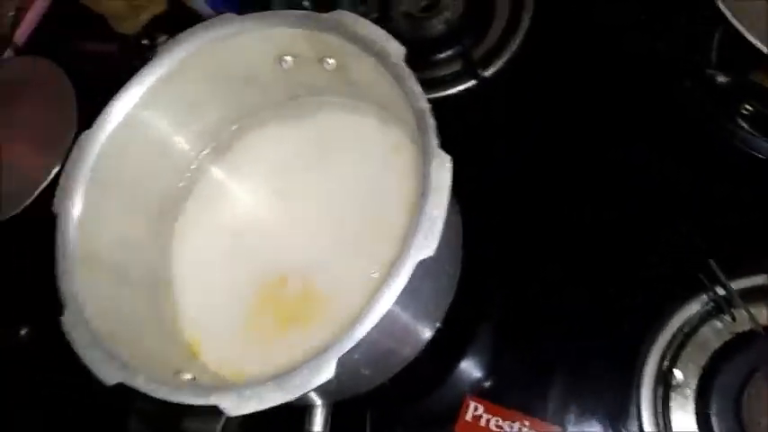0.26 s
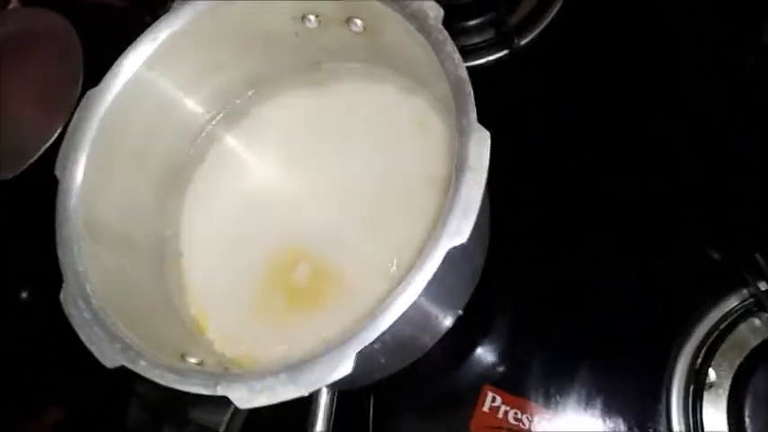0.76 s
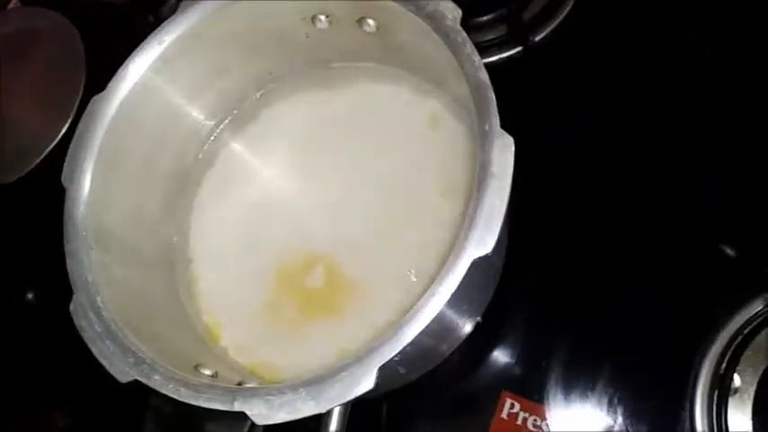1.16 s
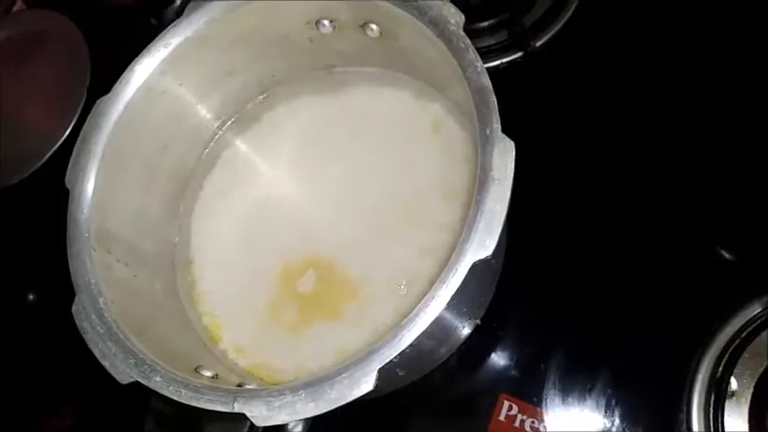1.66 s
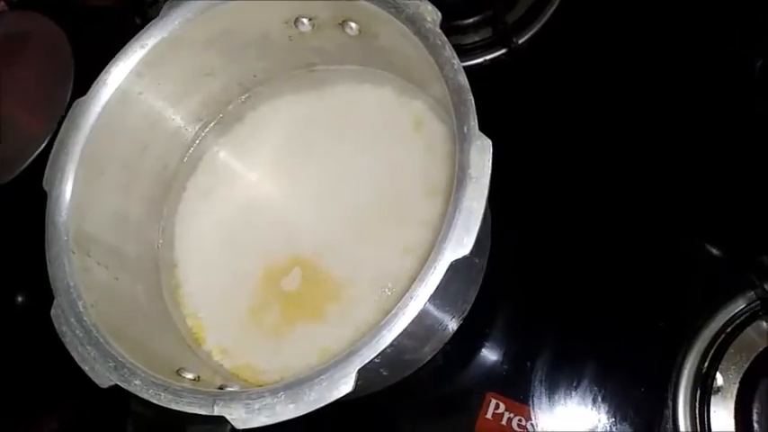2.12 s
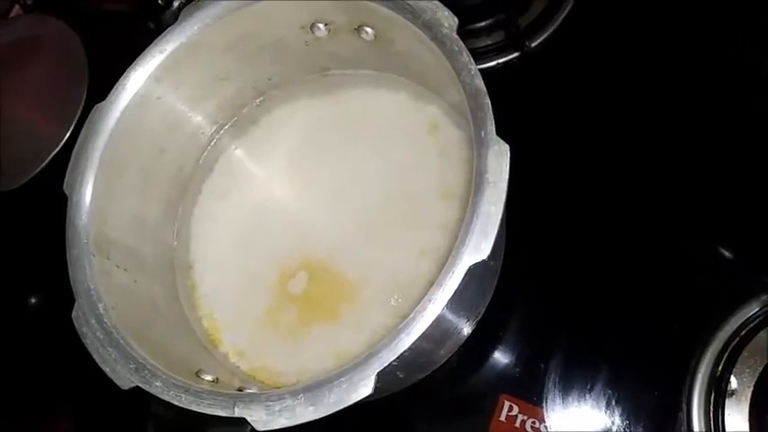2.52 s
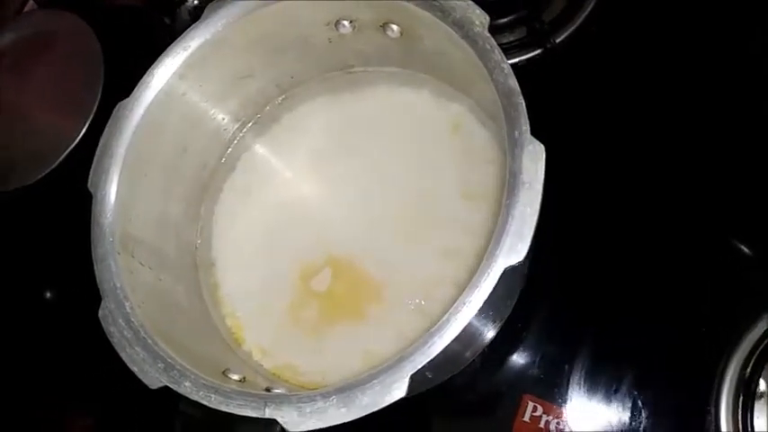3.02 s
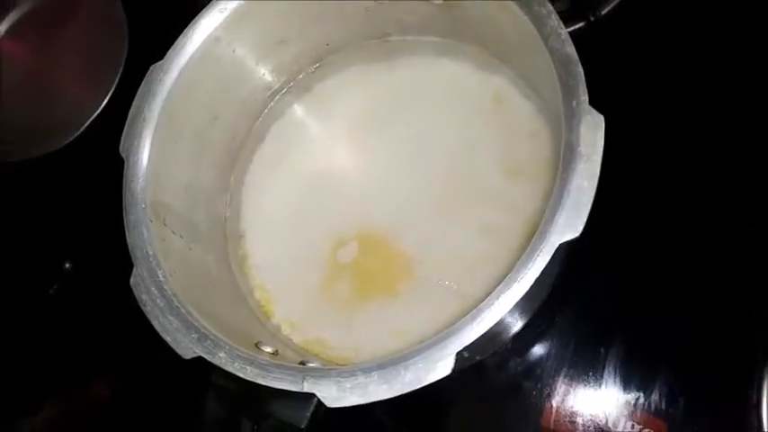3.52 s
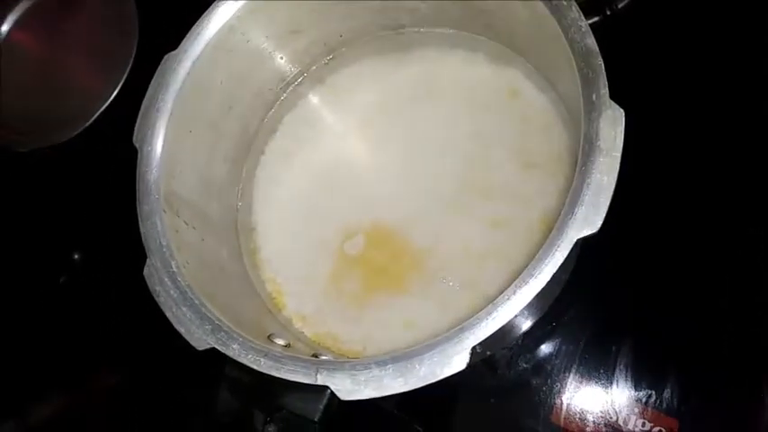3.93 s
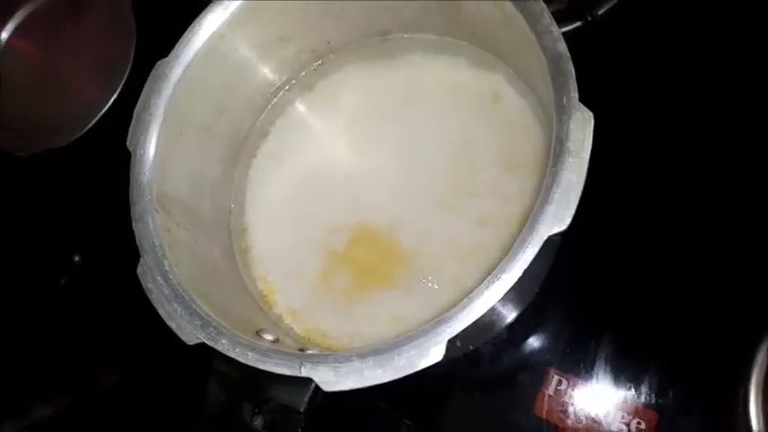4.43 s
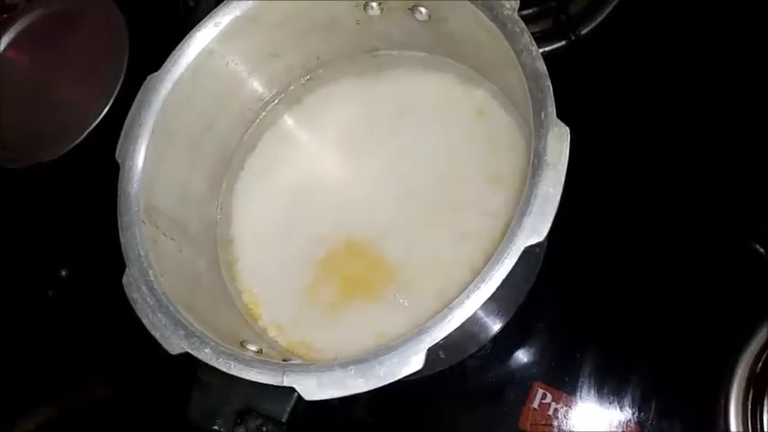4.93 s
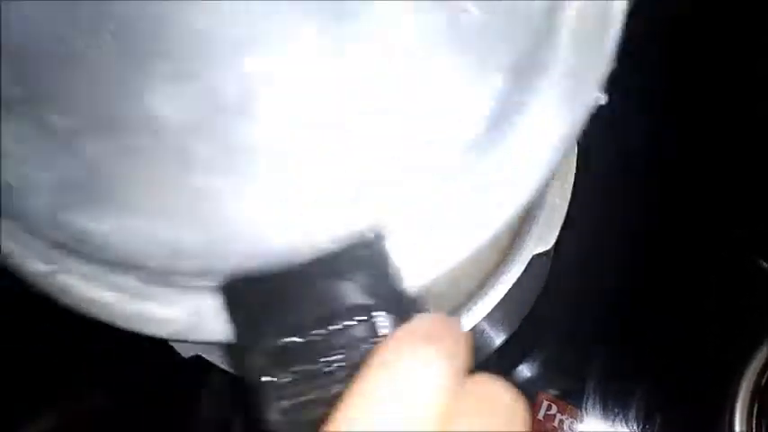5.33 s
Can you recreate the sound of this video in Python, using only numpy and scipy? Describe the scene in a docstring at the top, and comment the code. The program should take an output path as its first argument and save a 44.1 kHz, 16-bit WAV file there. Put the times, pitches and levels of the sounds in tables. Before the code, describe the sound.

In a quiet kitchen, two sharp metallic lighter snaps ignite a gas ring; the flame flutters while the lighter drops and a pot lid knocks and scrapes.

```python
"""A quiet kitchen and a hiss of gas come first; gusts, taps and bumps follow at the stove.
A spark lighter snaps twice, the ring under an open pressure cooker catches with a whoomp and flutters on.
Steel clinks, the lighter clatters down, the lid is picked up with a clank, later scrapes and meets the rim.
Gas, flame and friction are filtered noise under envelopes; whoomp and bumps are damped sines.
Struck metal is a noise crack, modes that ring on and the tail of a small, hard room."""
import sys
import numpy as np
from scipy import signal
from scipy.fft import rfft, irfft
from scipy.io import wavfile
from scipy.ndimage import uniform_filter1d

SR = 44100
rng = np.random.default_rng(int(sys.argv[2]) if len(sys.argv) > 2 else 0)


def persist_wave(psi):
    """Save psi, clipped to +-1, as 16-bit WAV."""
    counts = np.round(np.clip(psi, -1, 1) * 32767).astype(np.int16)
    wavfile.write(sys.argv[1], SR, np.atleast_2d(counts).T)


N = 245637
TIME = np.arange(N) / SR
AGE = TIME[:SR]  # the second that follows an event


def gain_of(db):
    """Level: converts decibels to an amplitude ratio."""
    return 10 ** (np.asarray(db) / 20)


def evened(x):
    """Normalisation: scales a signal to an rms of one."""
    return x / np.sqrt(np.mean(x ** 2) + 1e-20)


def read(points, hz):
    """Interpolation: reads a curve on a logarithmic frequency axis."""
    f, value = np.transpose(points)
    return np.interp(np.log(hz + 1), np.log(f + 1), value)


def coloured(points):
    """Spectral shaping: turns a table of levels into a magnitude spectrum."""
    return lambda hz: gain_of(read(points, hz))


def add(mix, s, sound):
    """Superposition: lays a stereo sound into the mix at time s."""
    part = mix[:, max(round(s * SR), 0):][:, :sound.shape[1]]
    part += sound[:, :part.shape[1]]


def dying(t60):
    """Exponential decay: loses 60 dB in t60 seconds."""
    return np.exp(-np.log(1000) * AGE / max(t60, 1e-3))


def held(hold, t60):
    """Sustained decay: holds for a while, then loses 60 dB in t60 seconds."""
    return np.exp(-np.log(1000) * np.maximum(AGE - hold, 0) / t60)


def onset(time_constant):
    """Exponential build-up: softens the start of a sound."""
    return 1 - np.exp(-AGE / time_constant)


def arch(length):
    """Half-sine envelope: swells and fades over length seconds."""
    return np.sin(np.pi * np.minimum(AGE / length, 1))


def wander(rate_hz, size):
    """Low-passed random fluctuation: slow chance with an rms of one."""
    hz = np.fft.rfftfreq(size, 1 / SR)
    spectrum = rfft(rng.standard_normal(size))
    return evened(irfft(spectrum / (1 + (hz / rate_hz) ** 4), size))


# Likeness of the sound at the two microphones: (frequency [Hz], left-right correlation [1])
MICROPHONE_LIKENESS = [(60, 0.9), (130, 0.75), (290, 1), (640, .5), (1300, -0.09), (3000, 0), (15000, 0.03)]


def noise(shape, size):
    """Spatial coherence: stereo noise shaped by shape(Hz), alike in both channels only at long waves."""
    hz = np.fft.rfftfreq(size, 1 / SR)
    left, other = rfft(rng.standard_normal((2, size)))
    same = np.clip(read(MICROPHONE_LIKENESS, hz), -1, 1)
    right = same * left + np.sqrt(1 - same ** 2) * other
    return evened(irfft(np.array([left, right]) * shape(hz), size))


def band(centre_hz, octaves):
    """Band-pass spectrum: a bell on an octave scale."""
    return lambda hz: np.exp(-.5 * (np.log2((hz + 1) / centre_hz) / octaves) ** 2)


def body(resonances, low_hz):
    """Damped resonance: broad peaks add in power, and small objects radiate no deep bass."""
    def shape(hz):
        power = sum(gain_of(db) ** 2 / (1 + (2 * (hz - f) / width) ** 2) ** 2
                    for f, width, db in resonances)
        return np.sqrt(power) * hz ** 2 / (hz ** 2 + low_hz ** 2)
    return shape


def crowded(shape, ripple_db):
    """Modal density: countless close modes comb a smooth spectrum into peaks and gaps."""
    grid = np.linspace(0, SR / 2, num=300)
    comb = rng.standard_normal(len(grid))
    comb = np.minimum(evened(comb - uniform_filter1d(comb, size=7)), 1.3)

    def combed(hz):
        ripple = ripple_db * np.interp(hz, grid, comb) * hz / (hz + 2500)  # least in the bass
        return shape(hz) * gain_of(ripple)
    return combed


def ring(modes, longest_t60, scatter=0.83):
    """Modal decay: hand-damped partials, which reflections swell and fade differently at each microphone."""
    out = np.zeros((2, SR))
    knots = np.linspace(0, 1, num=60)
    for hz, db, t60 in modes:
        t60 = np.clip(t60, .02, max(longest_t60, .02))
        t = AGE[:int(t60 * SR)]
        direct = np.exp(2j * np.pi * rng.random((2, 1)))
        real, imaginary = rng.standard_normal((2, 2, len(knots)))
        paths = direct + scatter * (real + 1j * imaginary) / np.sqrt(2)
        drift = np.array([np.interp(t, knots, path) for path in paths]) / np.hypot(1, scatter)
        partial = drift * np.exp((2j * np.pi * hz - np.log(1000) / t60) * t)
        out[:, :len(t)] += gain_of(db) * partial.imag
    return out


def room(source, t60, bass_life, treble_life):
    """Reverberation: in the tiled kitchen bass, middle and treble die at their own speeds."""
    below_mid = signal.filtfilt(*signal.butter(2, 2500, fs=SR), source)
    below_top = signal.filtfilt(*signal.butter(4, 10000, fs=SR), source)
    bass = below_mid * dying(t60 * bass_life)
    middle = (below_top - below_mid) * dying(t60)
    treble = (source - below_top) * dying(t60 * treble_life)
    return bass + middle + treble


def blows(rows, spectrum, modes, attack=0.00075, build=0.0095, bass_life=1.05, treble_life=.9,
          spiky_db=2, room_tilt_db=-.3, sustain=1.2):
    """Impact: a crack scattered by pot and hob, the metal's ring, then the room."""
    out = np.zeros((2, N))
    for s, crack_db, crack_t60, room_db, room_t60, ring_db, pan_db, hardness_db, *_ in rows:
        colour = crowded(spectrum, ripple_db=4)

        def struck(tilt_db):
            """Contact stiffness: a harder contact wakes the high resonances more."""
            return noise(lambda hz: colour(hz) * gain_of(tilt_db * np.log2((hz + 500) / 4000)), SR)
        crack = gain_of(crack_db) * dying(crack_t60) * struck(hardness_db)
        tail = room(struck(hardness_db + room_tilt_db), room_t60, bass_life, treble_life)
        tail = gain_of(room_db) * tail * onset(build)
        # uneven levels let single echoes stand out
        unevenness = evened(uniform_filter1d(rng.standard_normal((2, SR)), size=40))
        echoes = evened(gain_of(spiky_db * unevenness))
        ringing = gain_of(ring_db) * ring(modes, longest_t60=sustain * room_t60)
        sound = ((crack + tail) * echoes + ringing) * onset(attack)
        add(out, s, sound * gain_of([[pan_db / 2], [-pan_db / 2]]))
    return out


# How hard the flame burns: (time [s], vigour [dB])
FLAME_VIGOUR = [(1.5, 0.5), (1.75, -6), (2.25, 3), (2.62, -5), (2.85, -20), (3.3, -20), (3.95, -10),
                (4.45, -14), (4.6, -20.5), (5.57, -25.5)]
CATCH_S, ROAR_BUILD_S = FLAME_VIGOUR[0][0], .65


def vigour():
    """Heat release: the flame's strength in dB, at its lowest before ignition."""
    s, db = np.transpose(FLAME_VIGOUR)
    return np.interp(TIME, s, db, left=db.min())


# The quiet kitchen: (frequency [Hz], relative level [dB per Hz])
KITCHEN_COLOUR = [(15, -53), (25, -32), (66, -12.5), (101, -25), (118, -20.5), (146, -2), (186, -14),
                  (278, -7.5), (394, -15.5), (790, -16), (856, -14), (1390, -18), (9520, -33.5),
                  (15000, -38)]
KITCHEN_DB, WHINE_HZ, WHINE_DB = -64.5, 15624, -72


def kitchen(whine_width_hz=7):
    """Background noise: steady broadband air and a thin narrow-band electronic whine."""
    air = gain_of(KITCHEN_DB) * noise(coloured(KITCHEN_COLOUR), N)
    whine = noise(lambda hz: 1 / np.hypot(1, (hz - WHINE_HZ) / whine_width_hz) ** 1.3, N)
    return air + gain_of(WHINE_DB) * whine


# The hiss of the gas jet: (frequency [Hz], relative level [dB per Hz])
JET_SPECTRUM = [(3000, -41.5), (6000, -20), (7800, -7.5), (9400, 1.5), (11500, -8), (12600, -20),
                (15000, -29.5)]
# The gas valve: wide open at first, then eased back to a feed that follows the flame's vigour
OPEN_S, EASE_S, OPEN_RISE_S, EASE_T60_S = 0.037, .385, 0.041, .25
OPEN_DB, FEED_DB, FEED_FOLLOW = -60.5, -70.5, .3  # FEED_FOLLOW: dB per dB of vigour
SPIT_DB, SPIT_T60_S, SPIT_HZ = -49.5, 0.36, 8040  # the first spit of gas through the nozzle


def jet(spit_octaves=0.46):
    """Jet turbulence: gas hisses through the nozzle, loudest as the valve opens."""
    opened = np.clip((TIME - OPEN_S) / OPEN_RISE_S, 0, 1)
    eased = np.exp(-np.log(1000) * np.maximum(TIME - EASE_S, 0) / EASE_T60_S)
    flow = gain_of(OPEN_DB) * opened * eased + gain_of(FEED_DB + FEED_FOLLOW * vigour())
    out = flow * noise(coloured(JET_SPECTRUM), N)
    burst = np.minimum(AGE / OPEN_RISE_S, 1) * dying(SPIT_T60_S)
    add(out, OPEN_S, gain_of(SPIT_DB) * burst * noise(band(SPIT_HZ, spit_octaves), SR))
    return out


# Gusts of gas and air: (time [s], length [s], level [dB], frequency [Hz])
GAS_GUSTS = [(.07, 0.29, -51.5, 161.6), (.9, 0.21, -60.5, 202.5), (1.85, 0.12, -46, 164),
             (4.14, .27, -45, 140), (5.08, 0.097, -54.5, 159.5)]


def gusts(gust_octaves=0.12, rush_db=-11, rush_octaves=0.89):
    """Cavity resonance: gusts thrum briefly in the hollow under the pot, with a soft rush."""
    out = np.zeros((2, N))
    for s, length, db, hz in GAS_GUSTS:
        thrum = noise(band(hz, gust_octaves), SR)
        rush = gain_of(rush_db) * noise(band(hz, rush_octaves), SR)
        add(out, s, gain_of(db) * arch(length) * (thrum + rush))
    return out


# Dull bumps: (time [s], level [dB])
COUNTER_BUMPS = [(0.116, -47), (0.644, -54), (.724, -51), (2.599, -42.5), (3.13, -48), (3.21, -49.5),
                 (4.99, -51)]
COUNTER_HZ, COUNTER_T60_S = 68, 0.31


def bumps(rise=0.0069):
    """Single-mode vibration: every bump wakes the same low note of the counter."""
    out = np.zeros((2, N))
    for s, db in COUNTER_BUMPS:
        note = np.sin(2 * np.pi * COUNTER_HZ * AGE)
        thud = gain_of(db) * dying(COUNTER_T60_S) * onset(rise) * note
        add(out, s, np.array([thud, thud]))
    return out


# Light taps of knob, trigger and handle:
# (time [s], knock level [dB], knock frequency [Hz], tick level [dB], tick frequency [Hz])
HANDLING_TAPS = [(.279, -47, 760, -43, 9900), (0.364, -56, 520, -63, 10000),
                 (0.882, -42.5, 1950, -46, 7960), (1.606, -42, 614, -51, 1490),
                 (2.434, -47, 1291, -63.5, 8900), (4.02, -52, 620, -70, 8900), (4.903, -76, 900, -55, 5300),
                 (5.422, -52, 1400, -47, 11600)]
KNOCK_OCTAVES, KNOCK_T60_S = 0.54, 0.11
TICK_OCTAVES, TICK_T60_S = 0.23, 0.039


def taps(room_db=-13, room_t60=0.31, knock_rise=0.0028, tick_rise=0.00076):
    """Damped resonance: each tap is a knock and a tick with a little of the room after it."""
    out = np.zeros((2, N))

    def tap(db, hz, octaves, rise, t60):
        """Double decay: a quickly damped resonance and its reverberation."""
        envelope = (dying(t60) + gain_of(room_db) * dying(room_t60)) * onset(rise)
        return gain_of(db) * envelope * noise(band(hz, octaves), SR)
    for s, knock_db, knock_hz, tick_db, tick_hz in HANDLING_TAPS:
        add(out, s, tap(knock_db, knock_hz, KNOCK_OCTAVES, knock_rise, KNOCK_T60_S))
        add(out, s, tap(tick_db, tick_hz, TICK_OCTAVES, tick_rise, TICK_T60_S))
    return out


# Lighter snaps: (time [s], crack level [dB], crack t60 [s], room level [dB], room t60 [s],
# ring level [dB], left-right pan [dB], hardness [dB per octave])
LIGHTER_SNAPS = [(.6412, -3.5, 0.065, -14.5, 0.4, -25, -0.5, 0.58),
                 (1.3732, -5, 0.058, -11.5, 0.29, -33, 0.5, -0.54)]
# Broad resonances of the trigger: (frequency [Hz], width [Hz], level [dB])
TRIGGER_RESONANCES = [(520, 130, -12), (675, 382, -14), (1600, 2700, -12.5), (3260, 1500, -9),
                      (3770, 730, -6.5), (4240, 300, -16), (5060, 140, -23), (5450, 440, -9.5),
                      (6930, 990, -4.5), (8580, 727, -0.5), (9840, 6490, -6), (9250, 670, 0),
                      (10400, 810, -8), (10200, 232, -10.5), (12180, 147, -15.5), (15000, 2177, -9.5)]
# Modes of the trigger that ring on: (frequency [Hz], level [dB], t60 [s])
TRIGGER_MODES = [(1523, -14, 0.34), (2321, -14, 0.55), (2883, -11.5, 0.42), (3310, -12.5, 0.35),
                 (4100, -8.5, 0.13), (3590, -16, 0.32), (4370, -14, 0.27), (5200, -11.5, 0.17),
                 (5292, -2.5, 0.62), (6070, -5.5, 0.4), (6239, -11, 0.42), (6622, -12, 0.58),
                 (7600, -11, 0.46), (8470, -5.5, 0.23), (8500, 7, 0.34), (8950, -8, 0.44), (9300, -6, 0.49),
                 (9422, -4, 0.33), (9586, -9, 0.53), (10540, -3, 0.31), (10370, -5, 0.4),
                 (11113, -10.5, 0.33), (11276, -11, 0.26), (12500, -10, 0.36), (12800, -13.5, 0.32),
                 (13642, -16.5, 0.32), (14708, -10.5, 0.32), (15800, -5, 0.33)]


def lighter_snaps():
    """Impulsive excitation: the spark lighter's snap sets its many metal modes ringing."""
    return blows(LIGHTER_SNAPS, body(TRIGGER_RESONANCES, low_hz=130), TRIGGER_MODES, bass_life=1.1,
                 treble_life=0.87, spiky_db=2.5, room_tilt_db=-0.32, sustain=1.3)


# The ignition shakes the air of the room: (frequency [Hz], level [dB], t60 [s])
ROOM_MODES = [(65.2, -21, 0.55), (79.6, -23.5, 0.82), (195.1, -28, 0.24), (130.9, -33, 0.21),
              (240.7, -48.5, 0.26)]


def ignition(s=1.3835, spread=0.048, puff_db=-30, puff_hz=135, puff_t60=0.18,
             rumble_db=-35, rumble_hz=55, rumble_t60=0.63):
    """Beating room modes: the flame runs round the ring with a puff; two close modes throb as they die."""
    out = np.zeros((2, N))

    def swell(t60):
        """Sustained decay: holds while the flame spreads, then dies."""
        return onset(.004) * held(spread, t60)
    boom = sum(gain_of(db) * swell(t60) * np.sin(2 * np.pi * hz * AGE) for hz, db, t60 in ROOM_MODES)
    puff = gain_of(puff_db) * swell(puff_t60) * noise(band(puff_hz, 0.92), SR)
    rumble = gain_of(rumble_db) * swell(rumble_t60) * noise(band(rumble_hz, .4), SR)
    add(out, s, boom + puff + rumble)
    return out


# The flame's roar: (frequency [Hz], relative level [dB per Hz])
ROAR_SPECTRUM = [(120, -30.5), (200, 1), (340, -9.5), (470, -4.5), (1020, -23.5), (1130, -16.5),
                 (1820, -22), (4000, -39), (5200, -69), (8800, -120)]
# Levels and pitch at a vigour of 0 dB; ROAR_FOLLOW in dB per dB of vigour
FLUTTER_DB, FLUTTER_HZ, FLUTTER_HZ_PER_DB = -46.5, 170.2, 0.85
ROAR_DB, ROAR_FOLLOW, ROAR_START_DB = -55.5, 0.59, -32


def flame(width_hz=22, rumble_db=-11, flicker_db=3, flicker_hz=12):
    """Driven resonance: turbulence drums under the pot, over a soft roar and a low rumble."""
    drive, burning = vigour(), TIME - CATCH_S
    turn = np.exp(2j * np.pi * np.cumsum(FLUTTER_HZ + FLUTTER_HZ_PER_DB * drive) / SR)
    eddies = [noise(lambda hz: 1 / (1 + (hz / width_hz) ** 2), N) for _ in range(2)]
    # slow noise carried up to the pitch of the resonance
    drumming = evened((turn * (eddies[0] + 1j * eddies[1])).real)
    flutter = gain_of(FLUTTER_DB + drive) * drumming
    roar = noise(coloured(ROAR_SPECTRUM), N) + gain_of(rumble_db) * noise(band(70, 0.55), N)
    cold = np.clip(1 - burning / ROAR_BUILD_S, 0, 1)
    flicker = flicker_db * wander(flicker_hz, N)
    roar_db = ROAR_DB + ROAR_FOLLOW * drive + ROAR_START_DB * cold + flicker
    lit = np.clip(burning / 0.025 + 1, 0, 1)
    return lit * (flutter + gain_of(roar_db) * roar)


# Fingers rub softly on metal: (time [s], length [s], level [dB])
FINGER_RUBS = [(1.993, 0.08, -65), (2.99, .12, -64), (4.899, 0.12, -65.5), (5.5, 0.084, -57)]
RUB_HZ, RUB_OCTAVES = 6800, 0.34


def grain(grain_db=1.5, grain_hz=200):
    """Stick-slip friction: sliding contacts catch and slip, so their level is grainy."""
    return evened(gain_of(grain_db * wander(grain_hz, N)))


def rubs():
    """Friction noise: each rub is a grainy band of noise that swells and fades."""
    out = np.zeros((2, N))
    for s, length, db in FINGER_RUBS:
        add(out, s, gain_of(db) * arch(length) * noise(band(RUB_HZ, RUB_OCTAVES), SR))
    return out * grain()


WHISTLE_S, WHISTLE_LENGTH_S, WHISTLE_HZ, WHISTLE_DB = 2.0, 0.34, 1473, -57


def whistle(octaves=0.053):
    """Narrow-band noise: the burner whistles faintly as the flame grows."""
    out = np.zeros((2, N))
    tone = noise(band(WHISTLE_HZ, octaves), SR)
    add(out, WHISTLE_S, gain_of(WHISTLE_DB) * arch(WHISTLE_LENGTH_S) * tone)
    return out


# Soft pops of the flame: mean rate, level at 0 dB vigour, dB per dB of vigour, middle pitch, decay
FLAPS_PER_S, FLAP_DB, FLAP_FOLLOW, FLAP_HZ, FLAP_T60_S = 7, -54, .3, 480, .11


def flaps(spread_octaves=.6, width_octaves=.35, uneven_db=3, rise=.005):
    """Poisson process: tongues of flame tear off at random, each with its own pitch and strength."""
    out, drive = np.zeros((2, N)), vigour()
    burning = TIME > CATCH_S + ROAR_BUILD_S
    for at in np.flatnonzero(burning & (rng.random(N) < FLAPS_PER_S / SR)):
        pitch, strength = np.clip(rng.standard_normal(2), -2, 2)
        hz = FLAP_HZ * 2 ** (spread_octaves * pitch)
        pop = dying(FLAP_T60_S) * onset(rise) * noise(band(hz, width_octaves), SR)
        level_db = FLAP_DB + FLAP_FOLLOW * drive[at] + uneven_db * strength
        add(out, at / SR, gain_of(level_db) * pop)
    return out


# Steel clinks: (time [s], crack level [dB], crack t60 [s], room level [dB], room t60 [s],
# ring level [dB], left-right pan [dB], hardness [dB per octave])
STEEL_CLINKS = [(2.2247, -17.5, 0.179, -23, 0.28, -24, -1, -0.73),
                (2.2645, -30, 0.12, -54, 0.17, -28.5, -3, 2)]
# Broad resonances of the steel: (frequency [Hz], width [Hz], level [dB])
STEEL_RESONANCES = [(311.7, 420, -21), (2220, 2800, -20), (3907, 1700, -19.5), (5300, 823, -18.5),
                    (7660, 506, -28), (8558, 600, -17), (9201, 368, -16.5), (9470, 164, -0.5),
                    (11400, 512, -20), (12674, 1465, -18), (15440, 2145, -28)]
# Modes of the steel that ring on: (frequency [Hz], level [dB], t60 [s])
STEEL_MODES = [(8490, -3.5, 0.23), (8580, -20, .16), (9500, 7, 0.087), (9400, -6, 0.14), (9650, -1, 0.23),
               (9665, 6, 0.079), (15180, -8, .13)]


def steel_clinks():
    """Modal ringing: something steel clinks with a few high partials."""
    return blows(STEEL_CLINKS, body(STEEL_RESONANCES, low_hz=150), STEEL_MODES, bass_life=1.7,
                 treble_life=1.0, spiky_db=1.45, room_tilt_db=1.0)


# The lighter is dropped: (time [s], crack level [dB], crack t60 [s], room level [dB], room t60 [s],
# ring level [dB], left-right pan [dB], hardness [dB per octave])
LIGHTER_DROPS = [(2.5724, -16, .04, -19.5, 0.39, -41, 0.0024, 0.0012),
                 (2.602, -8, .16, -7.5, 0.47, -14.5, 0.0005, 0.014)]
# Broad resonances of the barrel: (frequency [Hz], width [Hz], level [dB])
BARREL_RESONANCES = [(1570, 258, -19.5), (1830, 2900, -20.5), (3300, 960, -13), (4350, 210, -16),
                     (5130, 1156, -16), (6773, 1600, -13), (7775, 378, -9.5), (8730, 820, -3),
                     (9920, 170, -4.5), (9580, 150, -16), (10500, 350, -18), (11300, 501, -13.5),
                     (11940, 218, -13), (12900, 513, -13), (13800, 748, -23), (15240, 2100, -15.5)]
# Modes of the barrel that ring on: (frequency [Hz], level [dB], t60 [s])
BARREL_MODES = [(1560, -16, 0.34), (3314, -10.5, 0.35), (3770, -5, 0.13), (4340, -10.5, 0.4),
                (4666, -11.5, 0.33), (4940, -11.5, 0.35), (4950, -10, 0.42), (6131, -13, 0.6),
                (6200, -13.5, 0.38), (6691, -6, 0.54), (6874, -10, 0.39), (7840, -2, 0.38),
                (7600, -6.5, 0.57), (8200, -12, 0.48), (8455, -5.5, 0.41), (8320, -3.5, 0.78),
                (9000, -11, 0.36), (9300, -1, 0.4), (9220, 0.5, 1), (9800, -3, 0.45), (11069, -15.5, 0.29),
                (11280, -13, 0.46), (11954, -14.5, 0.34), (13200, -15.5, 0.26), (12700, -16, 0.31),
                (14500, -17, 0.29), (14800, -12, 0.37), (14900, -9.5, 0.33)]


def lighter_clatter():
    """Successive impacts: the lighter's barrel clatters down and its modes ring."""
    return blows(LIGHTER_DROPS, body(BARREL_RESONANCES, low_hz=130), BARREL_MODES, bass_life=0.81,
                 treble_life=.85, spiky_db=1.3, room_tilt_db=-0.73)


# Knocks of the lid: (time [s], crack level [dB], crack t60 [s], room level [dB], room t60 [s],
# ring level [dB], left-right pan [dB], hardness [dB per octave], note of the spot hit [Hz])
LID_BLOWS = [(3.3872, -17, 0.074, -28.5, 0.5, -43.5, 2.1, 3, 3270),
             (3.4109, -11, 0.065, -22.5, 0.44, -21.5, 0.85, 0.5, 3470),
             (3.6301, -31.5, 0.11, -46.5, 0.6, -52.5, -0.68, -6, 1950)]


def lid_contacts(contact_db=-1.5, octaves=0.22, t60=0.047, attack=.0012):
    """Local resonance: each knock briefly rings the spot of the lid's edge where it lands."""
    out = np.zeros((2, N))
    for s, crack_db, *_, hz in LID_BLOWS:
        envelope = dying(t60) * onset(attack)
        add(out, s, gain_of(crack_db + contact_db) * envelope * noise(band(hz, octaves), SR))
    return out


# Broad resonances of the lid: (frequency [Hz], width [Hz], level [dB])
LID_RESONANCES = [(904, 280, -3), (1660, 1500, -8.5), (3190, 780, -27), (4580, 380, -20),
                  (5610, 1700, -21.5), (6870, 547, -29.5), (7605, 390, -29), (9130, 985, -32.5),
                  (10900, 1300, -41.5), (13007, 474, -48.5), (15589, 130, -38), (15659, 130, -60)]
# Modes of the lid that ring on: (frequency [Hz], level [dB], t60 [s])
LID_MODES = [(792, -14.5, 0.5), (903, 9.5, 0.08), (915, -5.5, 0.76), (1020, -12, 0.46), (1062, -13.5, 0.51),
             (1384, -7.5, 0.64), (1553, -18, 0.41), (1929, 0.5, 0.42), (1912, -3, 0.43),
             (2404, -10.5, 0.37), (3277, -32, 0.33), (3340, -24, 0.42), (3440, -28, 0.29),
             (4442, -25, 0.43), (4617, -20, 0.377), (4815, -20, 0.41), (5061, -22, 0.43), (5172, -29, 0.47),
             (5720, -19, 0.5), (5990, -25.5, 0.39), (7540, -32, 0.49)]


def lid_knocks():
    """Plate vibration: the lid clanks with a softer attack and lower modes."""
    return blows(LID_BLOWS, body(LID_RESONANCES, low_hz=350), LID_MODES, attack=0.0051, bass_life=1.045,
                 treble_life=1.0, spiky_db=0.0, room_tilt_db=0.5)


# The lid's scrape: (frequency [Hz], relative level [dB per Hz])
SCRAPE_COLOUR = [(800, -18.5), (2000, -7), (3200, 1), (5000, -6.5), (7500, -3), (11000, -6), (13000, -28)]
SCRAPE_S, SCRAPE_RISE_S, SCRAPE_LENGTH_S, SCRAPE_T60_S, SCRAPE_DB = 5.18, 0.033, 0.067, 0.3, -49.5


def lid_scrape():
    """Friction noise: the lid scrapes as it slides into place, grainy and then dying away."""
    out = np.zeros((2, N))
    stroke = np.minimum(AGE / SCRAPE_RISE_S, 1) * held(SCRAPE_LENGTH_S, SCRAPE_T60_S)
    add(out, SCRAPE_S, gain_of(SCRAPE_DB) * stroke * noise(coloured(SCRAPE_COLOUR), SR))
    return out * grain()


# The lid meets the rim: (time [s], crack level [dB], crack t60 [s], room level [dB], room t60 [s],
# ring level [dB], left-right pan [dB], hardness [dB per octave])
RIM_BLOWS = [(5.3438, -26.5, 0.052, -46.5, 0.3, -59.5, -4.3, 0.55),
             (5.3505, -26.5, 0.048, -38.5, 0.36, -42.5, -1.4, -1.05)]
# Broad resonances of the rim: (frequency [Hz], width [Hz], level [dB])
RIM_RESONANCES = [(563, 95, -9), (940, 420, -14), (1276, 380, -15), (1695, 98, 0), (3640, 11000, -21),
                  (8460, 3200, -9), (10894, 470, -28), (12900, 280, -25), (14480, 260, -30),
                  (15400, 254, -12)]
# Modes of the rim that ring on: (frequency [Hz], level [dB], t60 [s])
RIM_MODES = [(1281, 14, 0.22), (1710, -5, 0.11), (1900, -8, 0.064), (2610, -5, 0.17), (4370, -6, 0.15),
             (7370, -18, 0.14), (8493, -22, .25)]


def rim_touches():
    """Light impact: lid and rim meet in two quickly damped touches."""
    return blows(RIM_BLOWS, body(RIM_RESONANCES, low_hz=254), RIM_MODES, attack=0.00093, bass_life=2.24,
                 treble_life=0.47, spiky_db=-3.0, room_tilt_db=3.0)


def scene():
    """Superposition: everything that sounds at the stove."""
    gas = jet() + gusts() + ignition() + flame() + whistle() + flaps()
    hands = bumps() + taps() + rubs()
    lighter = lighter_snaps() + lighter_clatter()
    lid = lid_contacts() + lid_knocks() + lid_scrape() + rim_touches()
    return kitchen() + gas + hands + lighter + steel_clinks() + lid


# Balance of the two microphones: (frequency [Hz], left-right difference [dB])
MICROPHONE_BALANCE = [(60, -1.5), (110, 0.5), (200, 2), (380, 1), (700, -1.5), (1290, 2.5), (2380, 4.5),
                      (4400, 5), (8120, -2.5), (15000, -0.5)]
EDGE_HZ = 15800


def record(dry):
    """Transduction: each microphone has its own colour, the loudest cracks overload, then a band limit."""
    lean_db = read(MICROPHONE_BALANCE, np.fft.rfftfreq(N, 1 / SR))
    sides = gain_of(np.array([lean_db, -lean_db]) / 2)
    sides = sides / np.sqrt(np.mean(sides ** 2, axis=0))  # keeps the mean power of the pair
    heard = np.clip(irfft(rfft(dry) * sides, N), -1, 1)
    low_pass = signal.firwin(1023, EDGE_HZ, window=("kaiser", 8), fs=SR)
    return signal.oaconvolve(heard, low_pass[None], "same")


dry = scene()
out = record(dry)
persist_wave(out)
```